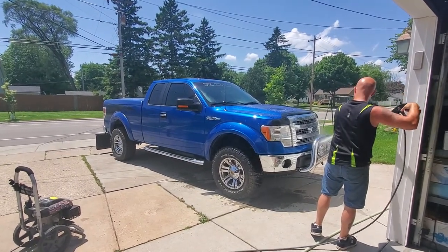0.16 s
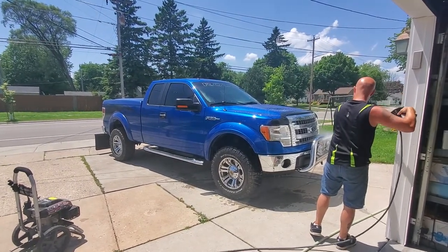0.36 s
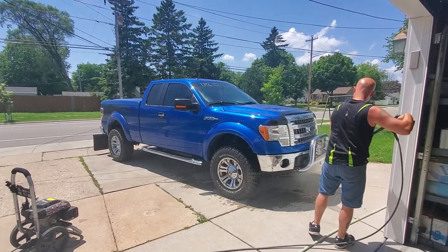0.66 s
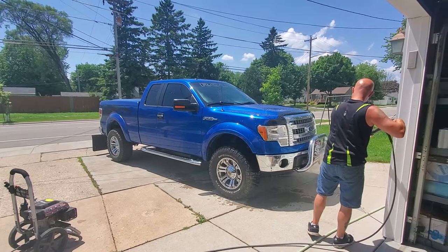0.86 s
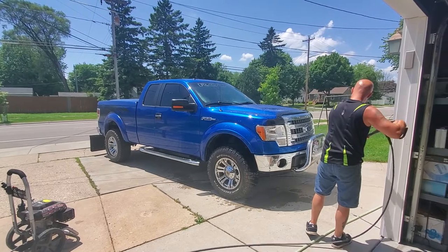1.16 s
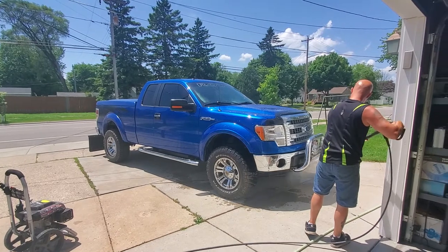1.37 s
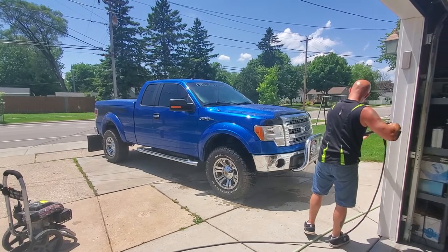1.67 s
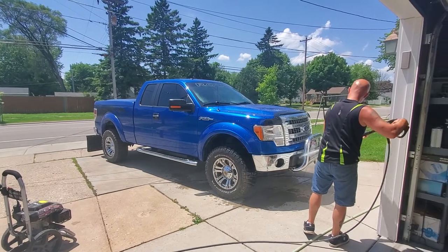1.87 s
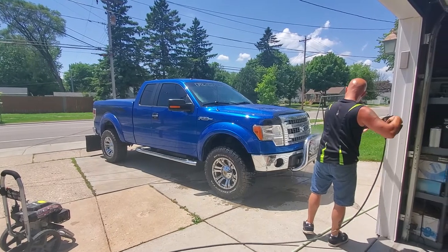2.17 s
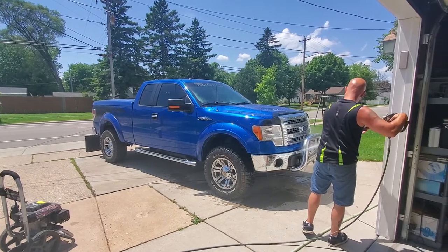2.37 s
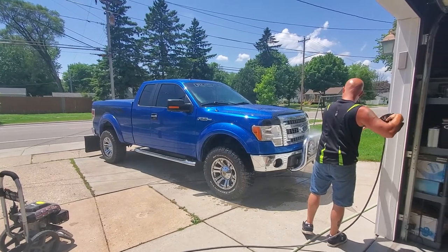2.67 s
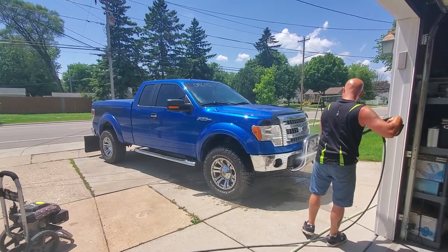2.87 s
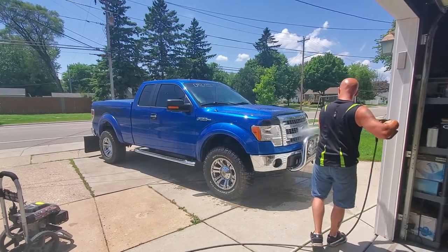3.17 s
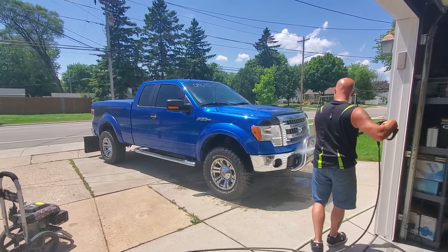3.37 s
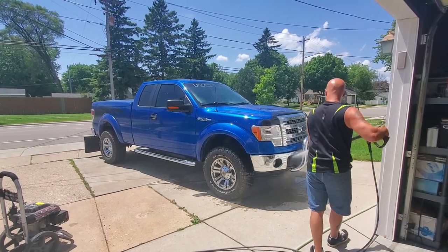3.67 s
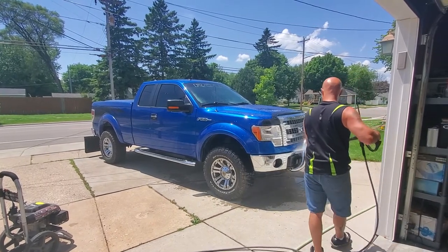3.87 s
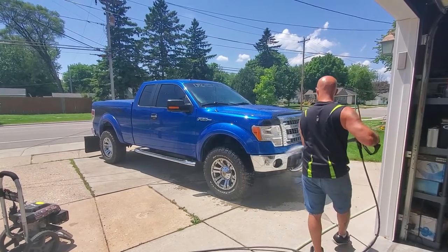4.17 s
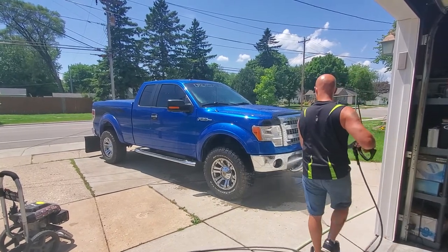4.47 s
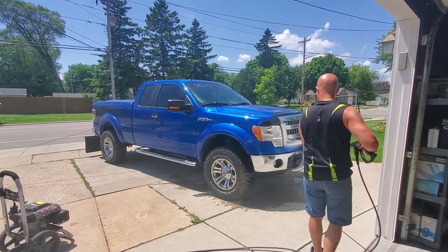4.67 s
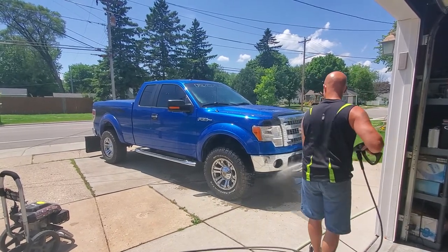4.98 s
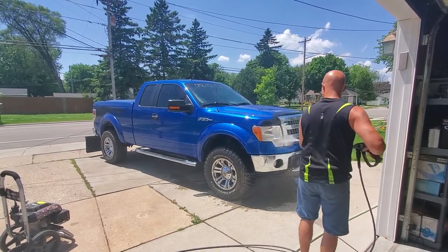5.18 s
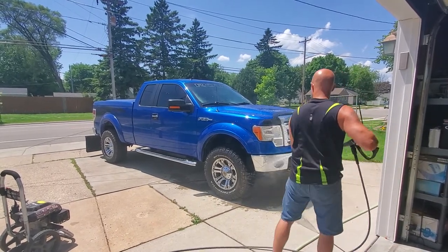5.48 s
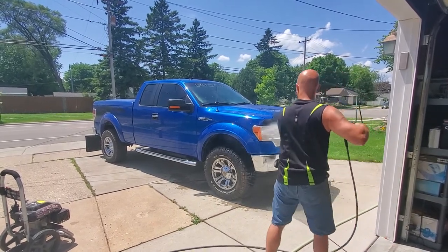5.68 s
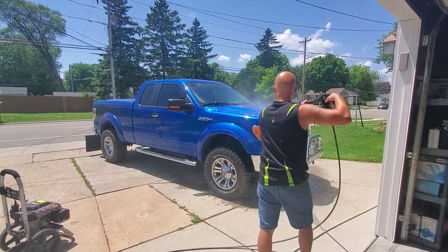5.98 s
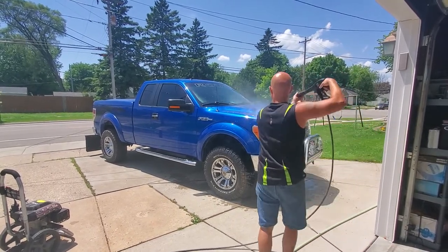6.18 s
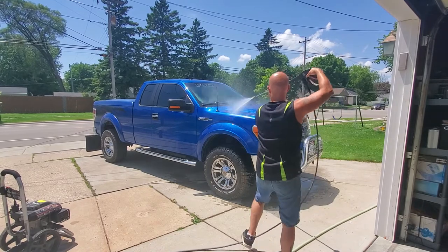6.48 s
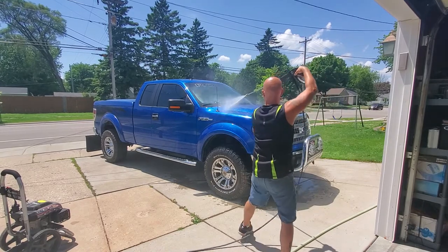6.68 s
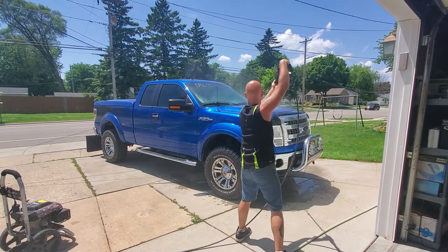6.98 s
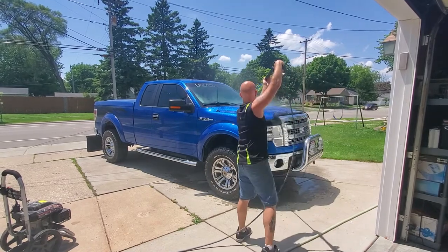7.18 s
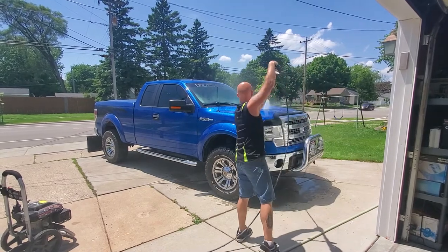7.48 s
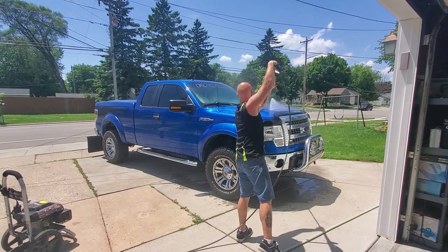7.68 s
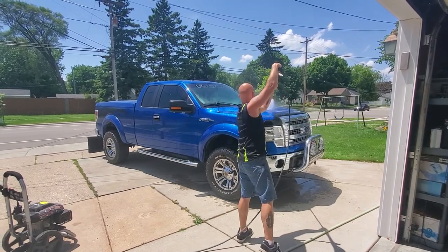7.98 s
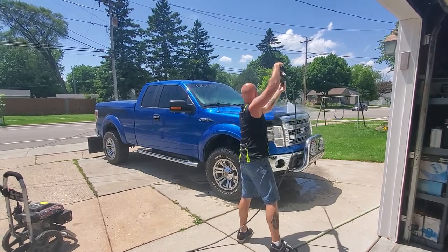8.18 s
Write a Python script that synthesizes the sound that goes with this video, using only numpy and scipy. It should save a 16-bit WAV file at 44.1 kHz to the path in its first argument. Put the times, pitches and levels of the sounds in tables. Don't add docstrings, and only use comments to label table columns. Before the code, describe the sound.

A petrol pressure washer runs without pause on a concrete driveway, left of the microphone at a garage door. Its single-cylinder engine fires about 29 times a second in a hard, buzzing chug with rattling valves and pump. Behind it, water hisses on a truck in brief swells, fullest around the middle, then sinks. Late on, the engine sounds slightly brighter as its echo comes off the truck.

```python
import sys
import numpy as np
from scipy import signal
from scipy.fft import rfft, irfft, next_fast_len
from scipy.io import wavfile
from scipy.ndimage import uniform_filter1d, map_coordinates

SR = 44100
rng = np.random.default_rng(int(sys.argv[2]) if len(sys.argv) > 2 else 0)


def gain_from_db(level_db):
    decades = np.asarray(level_db, float) / 20
    return 10 ** decades


def generate_wav(signal):
    frames = np.transpose(np.atleast_2d(signal))
    scaled = np.clip(frames, -1, 1) * 32767
    pcm = np.round(scaled).astype(np.int16)
    wavfile.write(sys.argv[1], SR, pcm)


N = 367353

FIRING_HZ = 29.15
SPEED_HZ = 29.153


def unit(x):
    return x / np.sqrt(np.mean(x ** 2) + 1e-20)


def along(points, hz):
    point_hz, value = np.transpose(points)
    return np.interp(np.log(hz + 1), np.log(point_hz + 1), value)


def filtered(x, response):
    size = next_fast_len(N + 8192)
    spectrum = rfft(x, size) * response(np.fft.rfftfreq(size, 1 / SR))
    return irfft(spectrum, size)[..., :N]


def wobble(rate):
    knots = rng.standard_normal(int(N * rate / SR) + 4)
    return map_coordinates(knots, [np.arange(N) * rate / SR])


def rush(spectrum, alike, patchy_db):
    z = signal.stft(rng.standard_normal((2, N)), nperseg=512)[2]
    field = uniform_filter1d(rng.standard_normal(z.shape[1:]), 6, 0)
    field = uniform_filter1d(field, 10, 1)
    pair = signal.istft(z * gain_from_db(patchy_db * unit(field)), nperseg=512)[1][:, :N]

    def mid_side(hz):
        spread = np.arccos(np.clip(along(alike, hz), -1, 1)) / 2
        return gain_from_db(along(spectrum, hz)) * [np.cos(spread), np.sin(spread)]

    mid, side = filtered(pair, mid_side)
    return unit(np.array([mid + side, mid - side]))


def crank():
    # time_s, late_ms
    hunting = [(0, 0), (.7, .5), (1.2, .4), (1.42, -.25), (1.6, .4), (2.02, .9), (2.4, -.6), (2.9, 0),
               (3.3, -.7), (3.9, -.15), (4.5, -.35), (4.87, -1.4), (5.2, -.7), (6.0, -.5), (6.55, -1.15),
               (6.9, -.1), (7.1, -.7), (7.7, .3)]
    first_s = .0203
    now = np.arange(N) / SR
    s, late_ms = np.transpose(hunting)
    return SPEED_HZ * (now - first_s - np.interp(now, s, late_ms) / 1000)


def crank_angle():
    return 2 * np.pi * crank()


def firings(jitter_s):
    turns = crank()
    whole = np.arange(int(turns[-1]) + 1)
    at = np.interp(whole, turns, np.arange(N))
    at = np.r_[at[0] - SR / SPEED_HZ, at, at[-1] + SR / SPEED_HZ]
    luck = rng.standard_normal((len(at), 3))
    return np.round(at + jitter_s * SR * luck[:, 0]).astype(int), luck[:, 1:]


def train(at, size_db, shape, early_s):
    pad = SR // 10
    spikes = np.bincount(at + pad - round(early_s * SR), gain_from_db(size_db), N + 2 * pad)
    return signal.fftconvolve(spikes[None], np.atleast_2d(shape), axes=1)[:, pad:pad + N]


def thud(at, luck):
    # multiple, level_db
    muffler = [(1, -25), (2, 0), (3, -7), (4, -3), (5, 0), (6, -4), (7, -7), (8, -10), (9, -9), (10, -5),
               (11, -17), (12, -23), (13, -27), (14, -20), (15, -15), (16, -25), (17, -30), (18, -17),
               (19, -33), (20, -34), (21, -26), (22, -27), (23, -29), (24, -22), (25, -17), (26, -34),
               (27, -27), (28, -32), (29, -18), (30, -27)]
    # pitch_hz,
    # level_db
    thud_range = [(5, -45), (29, -21), (52, 0), (298, 0), (318, -4.5), (390, -5), (420, -2), (520, 0),
                  (560, -6), (690, -2), (880, -1), (1100, -70)]
    order, db = np.transpose(muffler)
    hz = np.fft.rfftfreq(8192, 1 / SR)
    wall = lambda f: 1 + .5 * np.exp(-2j * np.pi * f * .011)
    direct = gain_from_db(np.where(order > 1, db, -5)) / np.abs(wall(order * FIRING_HZ))
    cepstrum = irfft(np.interp(hz, [*order * FIRING_HZ, 1000], np.log([*direct, .01])))
    cepstrum[1:len(hz) - 1] *= 2
    cepstrum[len(hz):] = 0
    late = np.cumsum(2 * np.pi * rng.random(len(order)) * (order > 11))
    delay = 1j * np.interp(hz, order * FIRING_HZ, late)
    pulse = -irfft(np.exp(rfft(cepstrum) - delay) * wall(hz))
    puffs = train(at, .65 * luck[:, 0], pulse, early_s=.00136)
    puffs = unit(filtered(puffs, lambda f: gain_from_db(along(thud_range, f))))
    shake = gain_from_db(-25.5 + .25 * wobble(8)) * np.sin(2 * crank_angle() + .7)
    tilt_db = lambda f: along([(60, 0.27), (200, 1.5), (330, 1.4), (1000, 1.4)], f)
    return filtered(gain_from_db(-21.5) * puffs + shake, lambda f: gain_from_db(tilt_db(f) * np.array([[1], [-1]])))


def unscreened():
    step_away_s = 6.8
    return 1 / (1 + np.exp((step_away_s - np.arange(N) / SR) / 0.12))


def blast_strength():
    return -11 + .5 * wobble(5.6) + 0.5 * unscreened()


def blast(at, luck, db):
    # pitch_hz, level_db (per Hz)
    gas_colour = [(500, -38), (1000, -15), (1500, -14), (2300, -7), (3500, -3.5), (4300, -8), (7000, -3),
                  (10000, 4), (16000, -0.5)]
    # pitch_hz, likeness (0-1)
    gas_alike = [(1000, 0.76), (3000, 0.78), (10000, 0.26)]
    # pitch_hz, width_hz, level_db
    shields = [(2420, 64, 11), (3863, 140, 11), (5090, 230, 11), (10360, 390, -6.5), (12020, 350, -4)]
    # pitch_hz, level_db
    shadow = [(2000, 0), (4000, -3), (9000, 0), (11500, -1), (12500, -6), (14000, -10)]
    t = np.arange(SR // 20) / SR
    spurt = (1 - np.exp(-t / .0004)) / (1 + (t / .0036) ** 3)
    trail = 0.34 * (1 - np.exp(-t / 0.005)) * gain_from_db(-60 * t / 0.12)
    size_db = .7 * luck[:, 1] + .4 * luck[:, 0]
    gate = train(at, size_db, spurt + trail, early_s=.0022)
    gas = gain_from_db(db - 5.5) * gate * rush(gas_colour, gas_alike, patchy_db=1.6)
    panel = lambda f: gain_from_db(-2) * np.exp(-.5 * ((f - 5160) / 430) ** 2)
    gas = gas + unscreened() * filtered(gas, panel)
    detour_s = np.array([[.00049], [.000714]])
    bounce = lambda hz: 1 + .42 * np.exp(-2j * np.pi * hz * detour_s)
    shade = lambda hz: gain_from_db([0.71 + 0 * hz, along(shadow, hz) - 1.2])

    def ring(f):
        modes = [gain_from_db(g) * 1j * f * w / (c * c - f * f + 1j * f * w) for c, w, g in shields]
        return 1 + sum(modes)

    return filtered(gas, lambda hz: bounce(hz) * ring(hz) * shade(hz))


def rattle(at, luck):
    # pitch_hz, level_db (per Hz)
    knock_colour = [(750, -58), (950, 2), (1200, -11), (1700, 5), (2000, -4), (2300, -3.5), (3000, -6.5),
                    (4200, -6), (6000, -8.5)]
    cycle = round(SR / FIRING_HZ)
    hz = np.fft.rfftfreq(cycle, 1 / SR)
    fading = gain_from_db(np.interp(np.arange(cycle) / SR, [0, .002, .006, .034], [-48, 16.0, -13, -0.5]))
    shared, left, right = rng.standard_normal((3, cycle))
    knocks = rfft(fading * np.array([shared + 1.03 * left, shared + 0.77 * right]))
    evened = knocks / np.sqrt(np.abs(knocks) + 1e-9)
    pattern = irfft(evened * gain_from_db(along(knock_colour, hz)), cycle)
    return gain_from_db(-31.5) * unit(train(at, 1.8 * luck[:, 1], pattern, early_s=0.0033))


def casing(at, luck):
    # pitch_hz, level_db (per Hz)
    roar_colour = [(25, -17), (60, 5), (150, 4.5), (350, 0), (1000, 0), (1250, -1.5), (1700, 1.5),
                   (2020, 0), (2300, 4.5), (2900, -2), (3500, 1), (5000, -2.5), (16000, -20)]
    # pitch_hz, likeness (0-1)
    roar_alike = [(60, 0.24), (300, 0.6), (450, 0), (700, 0.83), (1300, 0.35), (1700, 0.81), (2000, 0.43),
                  (2330, 0.58), (3000, 0.37), (8000, 0.2)]
    t = np.arange(SR // 20) / SR
    swell = gain_from_db(-60 * t / 0.066) * (1 - np.exp(-t / 0.0022))
    after = train(at, 1.4 * luck[:, 1], swell, early_s=0.0038)
    sway_db = .2 * wobble(3) + .6 * wobble(14)
    level = gain_from_db(-24.5 + sway_db)
    return level * (1 + .5 * after) * rush(roar_colour, roar_alike, patchy_db=1.27)


def whine():
    # multiple (of the firing rate), level_db (rms)
    gear_tones = [(25, -48), (31, -51), (32, -48), (34, -52), (44, -52), (47, -49), (53, -46), (58, -43),
                  (64, -48), (14, -55)]
    angle = crank_angle()
    total = 0
    for multiple, db in gear_tones:
        level = gain_from_db(db + 3.5 + 2.5 * wobble(7))
        total = total + level * np.sin(round(multiple) * angle + 0.83 * wobble(6))
    return total * gain_from_db([[1.2], [-1.2]])


def sweep():
    # time_s, hiss_db (between passes)
    reach = [(0, -24.5), (2.6, -25), (3.3, -23.5), (4.2, -21.5), (5.2, -23), (5.9, -25.5), (7.2, -27.5),
             (8.33, -29)]
    # time_s, swell_db, width_s
    passes = [(.68, 3.5, 0.076), (1.3, 3.5, 0.13), (1.87, 2.5, 0.17), (2.36, 2, 0.13), (2.93, 4.5, 0.063),
              (3.75, 1.5, 0.22), (4.25, 1, .1), (4.74, 2.5, 0.054), (5.45, 0.5, .1), (6.3, 2, .15),
              (7.62, 2.5, 0.091), (8.25, 5, 0.16)]
    now = np.arange(N) / SR
    swells = sum(db * np.exp(-.5 * ((now - s) / width_s) ** 2) for s, db, width_s in passes)
    return np.interp(now, *np.transpose(reach)) + swells


def spray(db):
    # pitch_hz, level_db (per Hz)
    hiss_colour = [(500, -42), (1500, -7.5), (4000, -7), (8000, 0), (16000, -2.5)]
    flicker_db = .4 * wobble(9) + .8 * wobble(35)
    level = gain_from_db(db - 1.0 + flicker_db)
    return level * rush(hiss_colour, [(1000, .3), (5000, .1)], patchy_db=.9)


def through_ports(noise):
    # pitch_hz, level_db
    left_port = [(300, -7.5), (600, -10.5), (1000, -4), (2300, -0.5), (3900, -2), (4450, -7), (6900, -9),
                 (7200, -15.5), (7500, -15), (8600, -16), (9100, -9), (10300, -7.5), (12200, -3),
                 (15500, 0.5)]
    right_port = [(300, -0.5), (600, -9.5), (1000, -2), (2400, -0.5), (3000, -3), (4200, -11.5), (7000, -7),
                  (7250, -27), (7980, -42), (8500, -7), (9800, -5.5), (12500, 0.5), (14400, -2.5),
                  (15700, -6)]
    return filtered(noise, lambda hz: gain_from_db([along(left_port, hz) + 5, along(right_port, hz) + 0.83]))


def left_first(sound):
    # pitch_hz, lead_radians
    bend = [(350, 0), (480, -.8), (850, -.4), (1100, .1), (1550, .6), (1900, .3), (2100, 1.1), (3000, .9),
            (3400, 1.6), (3750, -.2), (5300, -1.4), (6200, 0)]
    lead_s = 12 / 44100
    half_lead = lambda hz: np.pi * hz * lead_s + along(bend, hz) / 2
    return filtered(sound, lambda hz: np.exp(1j * half_lead(hz) * np.array([[1], [-1]])))


def scene():
    at, luck = firings(jitter_s=.0001)
    noise = rattle(at, luck) + casing(at, luck) + blast(at, luck, blast_strength()) + spray(sweep())
    return left_first(thud(at, luck) + whine() + through_ports(noise))


def band_limit(x):
    return signal.sosfilt(signal.butter(12, 17010, fs=SR, output="sos"), x)


def record(dry):
    rounded = dry / (1 + np.abs(dry / .93) ** 6) ** (1 / 6)
    band = lambda hz: gain_from_db(along([(15740, 0), (15900, -45), (16100, -70)], hz))
    return band_limit(filtered(rounded, band))


dry = scene()
out = record(dry)
generate_wav(out)
```